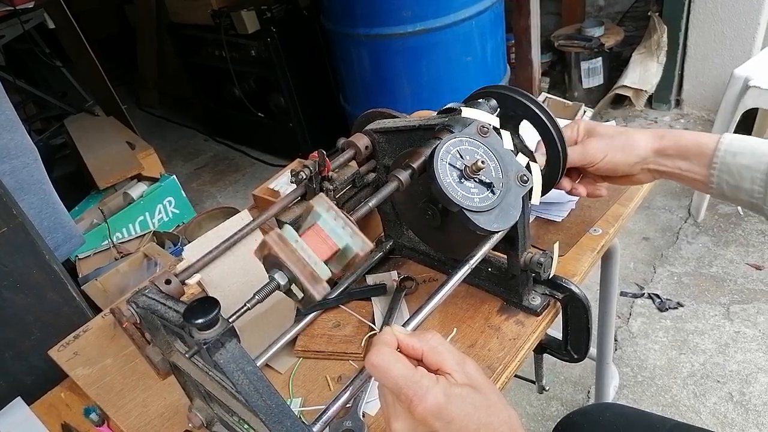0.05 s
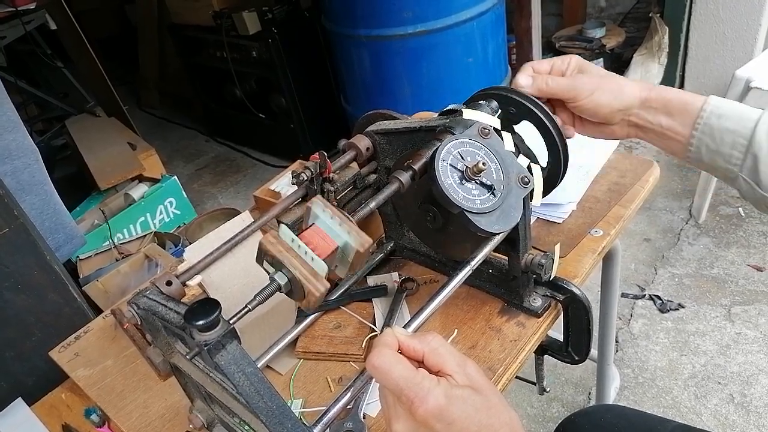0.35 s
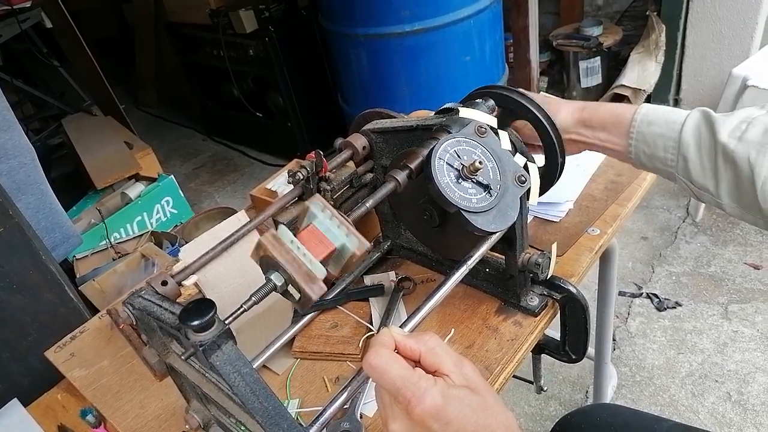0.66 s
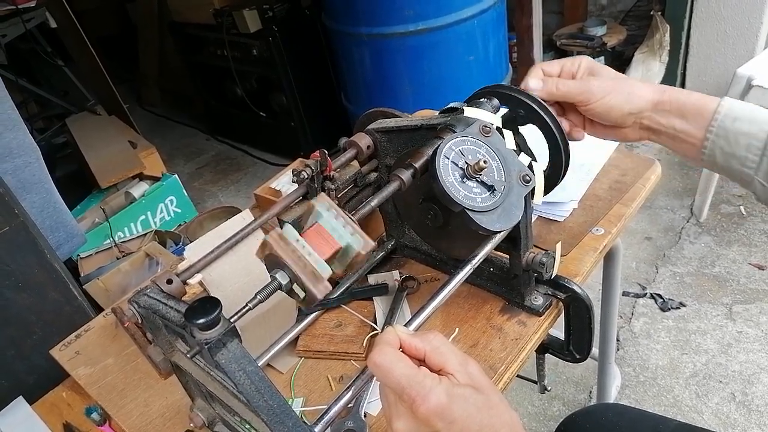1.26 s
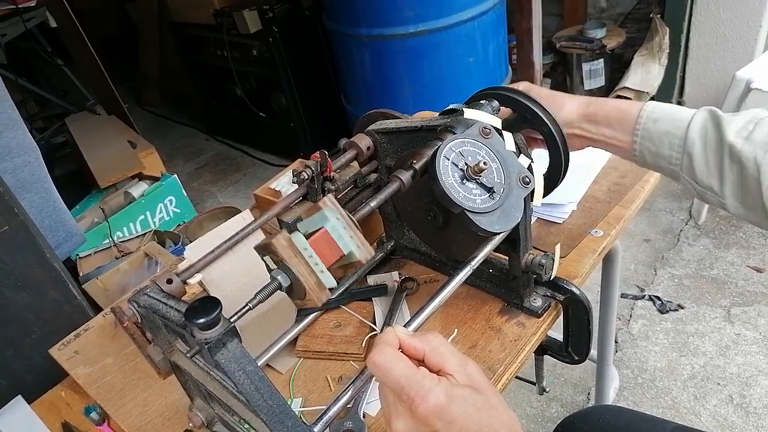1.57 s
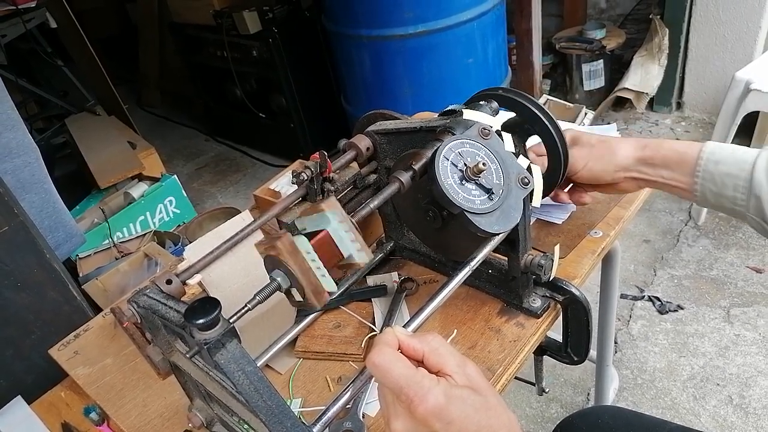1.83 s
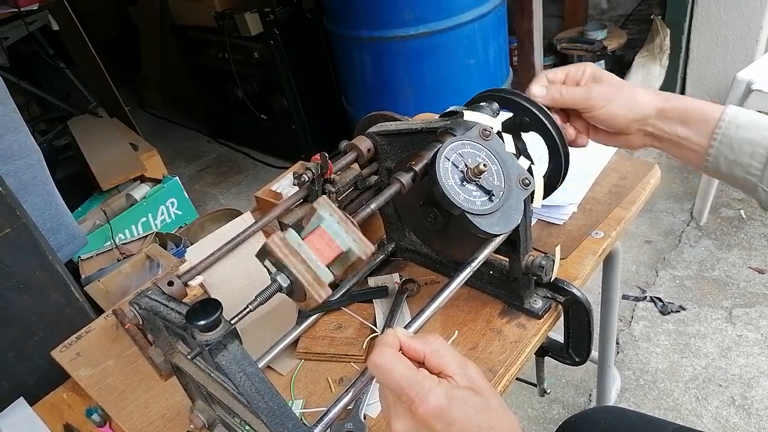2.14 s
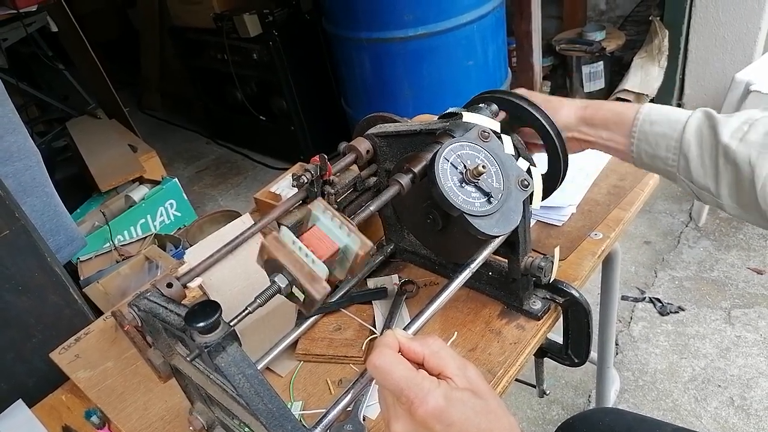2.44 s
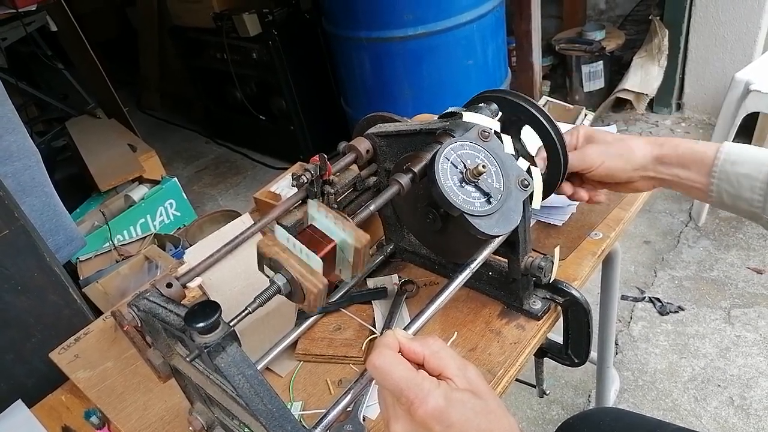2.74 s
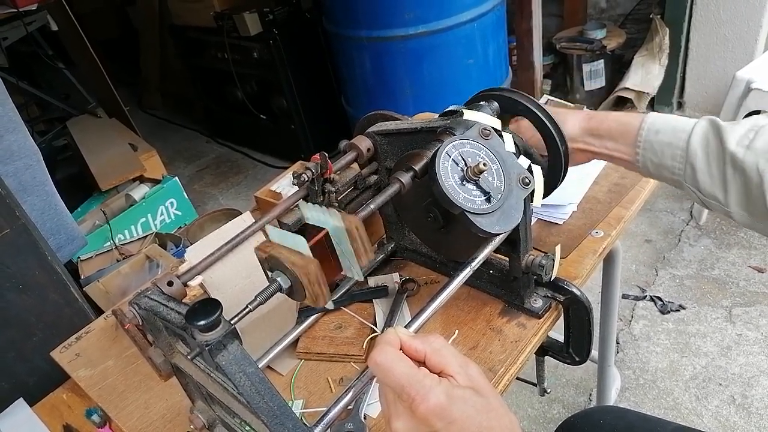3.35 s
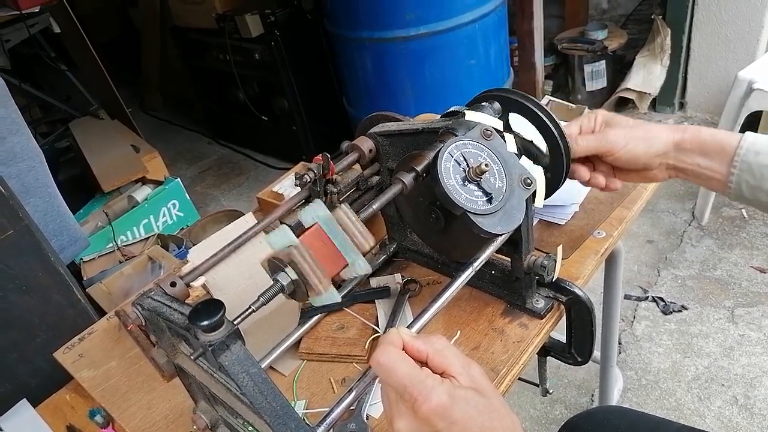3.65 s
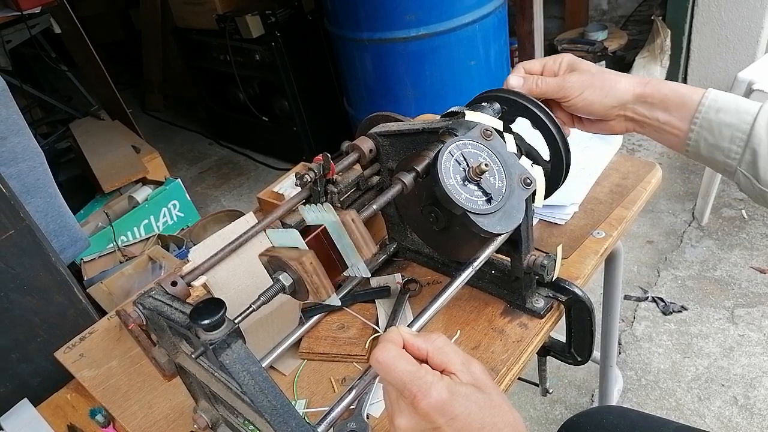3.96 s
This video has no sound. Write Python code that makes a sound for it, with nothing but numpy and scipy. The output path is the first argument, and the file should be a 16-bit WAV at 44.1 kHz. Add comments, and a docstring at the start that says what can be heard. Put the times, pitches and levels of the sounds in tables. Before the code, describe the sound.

Soft gear whir of a hand-turned winding machine, with faint clicks, scrapes and a low drone.

```python
"""A coil winder is cranked by hand in an open workshop. Friction and small impacts in its gears,
bearings and spindle make a soft whir, and the bobbin ticks and knocks. Twice the copper wire
drags through its guide, where stick-slip motion gives a run of short, bright scrapes.
Underneath lie the room's rumble and a low harmonic drone, probably a distant engine,
that climbs slowly in pitch and drops back."""
import sys
import numpy as np
from scipy import signal
from scipy.fft import rfft, irfft
from scipy.io import wavfile

SR = 44100
rng = np.random.default_rng(int(sys.argv[2]) if len(sys.argv) > 2 else 0)


def dump_mix(stems):
    """Bounce the given channels to the path in sys.argv[1] as a 16-bit WAV at rate SR."""
    frames = np.atleast_2d(stems).T  # one column per channel
    limited = np.clip(frames, -1, 1)  # hard clip at full scale
    pcm = np.round(limited * 32767).astype(np.int16)
    wavfile.write(sys.argv[1], SR, pcm)


N = 176400


def from_db(db):
    """Amplitude ratio: tenfold for every 20 dB."""
    return 10 ** (np.asarray(db) / 20)


def unit_rms(x):
    """Normalisation to unit mean power."""
    return x / np.sqrt(np.mean(x ** 2) + 1e-20)


def in_time(rows):
    """Linear interpolation of (seconds, value) rows at every sample."""
    return np.interp(np.arange(N) / SR, *np.transpose(rows))


def at_hz(rows, hz):
    """Interpolation of (Hz, value) rows on a logarithmic frequency axis."""
    row_hz, value = np.transpose(rows)
    return np.interp(np.log(hz), np.log(row_hz), value)


def colour(x, spectrum):
    """Zero-phase filtering by a curve of (Hz, dB) rows."""
    hz = np.maximum(np.arange(N // 2 + 1) * SR / N, 1)
    return irfft(rfft(x) * from_db(at_hz(spectrum, hz)), N)


def drift(rate_hz):
    """Low-passed noise: a slow random wander of unit spread."""
    hop, settle = 40, 2000
    pole = np.exp(-2 * np.pi * rate_hz * hop / SR)
    white = rng.standard_normal(N // hop + settle + 2)
    slow = signal.lfilter([1], [1, -2 * pole, pole * pole], white)[settle:]
    return np.interp(np.arange(N) / hop, np.arange(len(slow)), unit_rms(slow))


def banded_noise(spectrum, flicker_db):
    """Partially coherent stereo noise whose half-octave bands flicker independently."""
    # Each row: frequency in Hz, left-right correlation.
    correlation = [(40, 1), (130, 0.83), (300, 0.92), (650, 0.4), (1400, -0.44), (2800, 0.16),
                   (6000, -0.11), (14000, 0.031)]
    edges = 20 * 2 ** (np.arange(21) / 2)
    out, white = 0, rng.standard_normal((2, 2, N))
    for k, (low, high) in enumerate(zip(edges, edges[1:])):
        bandpass = signal.butter(2, [low, high], "band", fs=SR, output="sos")
        mid, side = signal.sosfilt(bandpass, white[k % 2])
        alike = np.clip(at_hz(correlation, np.sqrt(low * high)), -1, 1)
        band = np.sqrt(1 + alike) * mid + np.sqrt(1 - alike) * side * [[1], [-1]]
        out = out + from_db(flicker_db * drift(14.0)) * band
    return unit_rms(colour(out, spectrum))


def grains(per_s, spread_db):
    """A Poisson process of tiny contacts of uneven strength."""
    return (rng.random(N) < per_s / SR) * from_db(spread_db * np.minimum(rng.exponential(1, N), 4))


def resonate(contacts, modes, waver_db):
    """Forced resonance: contacts drive damped modes, differently on each side and in wavering strength."""
    out = 0
    for hz, width_hz, db in modes:
        radius = np.exp(-np.pi * width_hz / SR)
        feedback = [1, -2 * radius * np.cos(2 * np.pi * hz / SR), radius * radius]
        drive = contacts * rng.standard_normal((2, N)) * from_db(waver_db * np.tanh(drift(18.0)))
        out = out + from_db(db) * unit_rms(signal.lfilter([1, 0, -1], feedback, drive))
    return unit_rms(out)


def stroke(start, length, attack_s, release_s):
    """An envelope with linear rise, hold and exponential decay."""
    t = np.arange(N) / SR - start
    return np.clip(t / attack_s, 0, 1) * np.exp(-np.maximum(t - length, 0) / release_s)


def die_away(contacts, decay_s):
    """Incoherent summation: the envelope of exponentially fading contacts whose energies add."""
    return np.sqrt(signal.lfilter([1], [1, -np.exp(-2 / (decay_s * SR))], contacts ** 2 + 1e-18))


def pan(db):
    """Direction by level difference: the left gains what the right loses."""
    return from_db([[db], [-db]])


def gears():
    """Bearing friction gives broadband noise; tooth impacts ring the frame. Both follow the cranking."""
    # Each row: frequency in Hz, relative spectral density in dB.
    spectrum = [(100, -17), (250, -3.5), (380, -5), (500, -6.5), (900, -6), (1350, -8.5), (1850, -10.5),
                (2700, -18.5), (3600, -22.5), (4200, -26.5), (5800, -31), (6500, -34.5), (7700, -35.5),
                (8400, -42.5), (10800, -41.5), (13000, -58), (15000, -59)]
    # Each row: frequency in Hz, bandwidth in Hz, relative level in dB.
    frame_modes = [(368, 39, -1.5), (856, 210, -9.5), (1295, 50, -2), (1570, 96, -5), (1808, 220, -2.5),
                   (2185, 190, -6.5), (3060, 59, -10), (3310, 110, -9), (3690, 200, -12.5),
                   (5680, 170, -22)]
    # Each row: time in seconds, relative level in dB.
    effort = [(0, -60.5), (.24, -61.5), (.4, -60.5), (.68, -61), (.85, -60.5), (1.0, -60.5), (1.45, -61),
              (1.9, -60.5), (2.3, -59.5), (2.55, -60), (2.72, -60), (2.9, -60), (3.1, -60), (3.25, -60),
              (3.5, -58.5), (3.65, -60), (4, -58)]
    rush = from_db(3) * banded_noise(spectrum, flicker_db=0.23)
    patter = from_db(-3.5) * resonate(grains(per_s=440, spread_db=2), frame_modes, waver_db=1.0)
    return from_db(in_time(effort)) * (rush + patter)


def bearing():
    """Random excitation: fine rolling contacts sustain a thin metallic ring."""
    # Each row: frequency in Hz, bandwidth in Hz, relative level in dB.
    modes = [(7400, 120, -3), (12000, 120, -13), (12700, 160, -14)]
    # Each row: time in seconds, level in dB.
    level = [(0, -87), (.38, -80.5), (.65, -91), (1.0, -88), (1.75, -89), (2.0, -92), (2.18, -81),
             (2.4, -89.5), (3.5, -85), (4, -89)]
    ring = resonate(grains(per_s=2700, spread_db=6.0), modes, waver_db=4.5)
    return from_db(in_time(level)) * ring * pan(db=1.5)


def engine():
    """Periodic firing: low partials follow one rate and reach the right side sooner and louder."""
    # Each row: time in seconds, firing rate in Hz.
    firing_rate = [(0, 43.74), (.3, 45.74), (.7, 49), (1.25, 52.36), (1.6, 52), (1.85, 56.07), (2.2, 62.17),
                   (2.55, 64.16), (2.9, 66.17), (3.2, 71.92), (3.37, 72.4), (3.44, 50.95), (4, 52.5)]
    # Each row: time in seconds, relative level in dB.
    level = [(0, -47), (.06, -50), (.14, -41.5), (.24, -47.5), (.28, -51), (.32, -42.5), (.36, -50),
             (.45, -38), (.57, -47.5), (.64, -36.5), (.7, -36.5), (.79, -60), (.89, -40.5), (.99, -38.5),
             (1.065, -47.5), (1.11, -42.5), (1.19, -36), (1.26, -35.5), (1.33, -54), (1.41, -41.5),
             (1.47, -53), (1.53, -44), (1.61, -46), (1.66, -60), (1.71, -42), (1.77, -52), (1.85, -54),
             (1.91, -37.5), (1.96, -48), (2.0, -40), (2.04, -45.5), (2.09, -38.5), (2.13, -43), (2.16, -35),
             (2.37, -34), (2.52, -34), (2.73, -41), (2.79, -54), (2.86, -48), (2.96, -46), (3.04, -38),
             (3.1, -40.5), (3.15, -37), (3.22, -44), (3.33, -42), (3.42, -46.5), (3.55, -46), (3.63, -47.5),
             (3.73, -42.5), (3.88, -46.5), (4, -76)]
    # Each row: multiple of the firing rate, relative level in dB.
    orders = [(0.782, -16), (1, 6.5), (1.5, -13), (2.002, -18)]
    gain_db, waver_db, left_lag_s = -2.94, 0.67, 0.00034
    hz = in_time(firing_rate)
    cycles = np.cumsum(hz) / SR - hz * left_lag_s * np.array([[1], [0]])
    drone = 0
    for order, db in orders:
        amplitude = from_db(db + waver_db * drift(28.0))
        drone = drone + amplitude * np.sin(2 * np.pi * (order * cycles + rng.random()))
    return from_db(gain_db + in_time(level)) * unit_rms(drone) * pan(db=-2.1)


def rumble():
    """Ambient noise: the workshop's low background swells and sinks."""
    # Each row: frequency in Hz, relative spectral density in dB.
    spectrum = [(15, -5), (30, -2.5), (50, -4.5), (80, 1.5), (102, -6), (118, -9.5), (136, -3),
                (160, -15.5), (200, -13.5), (228, -12), (270, -17.5), (380, -18.5), (600, -30.5),
                (2000, -73)]
    # Each row: time in seconds, level in dB.
    level = [(0, -53.5), (.16, -51.5), (.7, -52), (.83, -53), (1.0, -50), (1.25, -53.5), (1.38, -51.5),
             (1.55, -51), (2.0, -52), (2.4, -51.5), (2.72, -48.5), (2.9, -53.5), (3.08, -52), (3.3, -51.5),
             (3.7, -52), (3.87, -50.5), (4, -54)]
    return from_db(in_time(level)) * banded_noise(spectrum, flicker_db=-1.0) * pan(db=-1.3)


def wire():
    """Stick-slip friction: sliding wire hisses; where it catches it rasps, squeaks and rings its guide."""
    # Each row: time in seconds, level in dB.
    slide_level = [(0, -72), (.2, -82), (1.1, -79.5), (1.24, -78), (1.315, -70.5), (1.42, -80), (1.54, -78),
                   (1.66, -75), (1.75, -66), (1.81, -73.5), (1.89, -65.5), (1.96, -82.5), (2.8, -84),
                   (2.98, -73.5), (3.1, -75), (3.24, -77.5), (3.45, -72.5), (3.53, -76.5), (3.62, -69.5),
                   (3.7, -83), (3.9, -83), (3.99, -59)]
    # Each row of both: frequency in Hz, relative spectral density in dB.
    slide_spectrum = [(1500, -16), (3500, 4), (4500, 0), (5700, 0.5), (6500, -3), (7600, -0.5),
                      (8400, -2.5), (10700, 0.5), (12000, -9), (13200, -12), (15000, -14)]
    rasp_spectrum = [(2000, -34), (4000, -5), (4600, 7), (5800, -2), (6500, -3), (7600, 4), (8300, 0),
                     (9400, -1), (11200, 4), (12300, -7), (14000, -3), (15200, -7)]
    # Each row: frequency in Hz, bandwidth in Hz, relative level in dB.
    guide_modes = [(4677, 40, -2), (5005, 65, -1), (5244, 110, -5), (5673, 70, -2), (5850, 300, -5),
                   (6017, 70, -4), (7866, 60, -11), (9283, 100, -4), (9610, 130, -4), (10380, 160, -3),
                   (11000, 400, -6), (14700, 150, -14)]
    # Each row: start and length in seconds, rasp and guide levels in dB,
    # then frequency in Hz and level in dB of the low squeak and of the high squeak.
    scrapes = [(1.347, 0.023, -64, -71, 6150, -72, 8730, -75), (1.377, .02, -70, -72, 4900, -69, 7840, -75),
               (1.446, 0.046, -67, -71, 5280, -70, 9500, -71),
               (1.494, 0.026, -84, -77, 5550, -69.5, 9450, -81),
               (1.565, .011, -68, -67, 5070, -67, 11000, -72),
               (1.579, .032, -75, -69, 6010, -70, 10150, -71),
               (3.102, .014, -63, -70, 5700, -68, 10400, -75),
               (3.118, .022, -68, -68, 4670, -62, 10300, -76),
               (3.158, 0.022, -71, -69, 5600, -64, 9550, -69),
               (3.216, .014, -71, -71, 5040, -77, 10100, -80),
               (3.271, 0.022, -71, -68, 4985, -67, 9500, -73),
               (3.313, .018, -71, -77, 5670, -76, 9900, -76), (3.364, .03, -76, -77, 5370, -72, 9280, -83)]
    relative_bandwidth = 0.034  # wide enough to make the squeaks hoarse
    slips = grains(per_s=2400, spread_db=2)
    grain = unit_rms(die_away(slips, decay_s=0.0028))
    rasp = grain * banded_noise(rasp_spectrum, flicker_db=-3.0)
    guide_ring = resonate(slips, guide_modes, waver_db=2.5)
    hiss = unit_rms(np.sqrt(grain)) * banded_noise(slide_spectrum, flicker_db=2.0)
    out = from_db(in_time(slide_level)) * hiss
    for start, length, rasp_db, guide_db, low_hz, low_db, high_hz, high_db in scrapes:
        tones = from_db(guide_db) * guide_ring
        for hz, db in ((low_hz, low_db), (high_hz, high_db)):
            squeak = resonate(slips, [(hz, relative_bandwidth * hz, 0)], waver_db=4.5)
            tones = tones + from_db(db) * squeak
        # The resonances build and fade more slowly than the rasp.
        out = out + from_db(rasp_db) * stroke(start, length, attack_s=0.0033, release_s=0.0037) * rasp
        out = out + stroke(start, length, attack_s=0.0094, release_s=0.013) * tones
    return out


def spindle():
    """Modulated friction: grainy noise swells where the spindle rubs harder in its turn."""
    # Each row: start in seconds, length in seconds, level in dB.
    swishes = [(0.148, 0.1, -67), (0.262, 0.092, -64.5), (0.355, 0.061, -60), (0.427, 0.095, -61.5),
               (0.916, 0.06, -61.5), (1.005, 0.12, -65.5), (1.622, 0.071, -63.5), (1.722, 0.032, -63),
               (2.103, 0.15, -62.5), (2.27, 0.071, -59.5), (2.655, 0.13, -64), (3.037, 0.11, -62.5),
               (3.34, .05, -62.5), (3.42, 0.14, -67), (3.89, 0.086, -69)]
    # Each row: frequency in Hz, relative spectral density in dB.
    spectrum = [(500, -8.5), (1300, 8.5), (2100, 0.5), (2700, -2.5), (3600, -1), (4300, -14), (7400, -24.5),
                (15000, -42)]
    envelope = sum(from_db(db) * stroke(start, length, attack_s=0.0094, release_s=0.013)
                   for start, length, db in swishes)
    grain = unit_rms(die_away(grains(per_s=620, spread_db=4.0), decay_s=0.0035))
    return envelope * grain * banded_noise(spectrum, flicker_db=-0.5)


def crank():
    """Sliding friction: the crank scuffs in soft, dull bursts of noise."""
    # Each row: start in seconds, length in seconds, level in dB.
    rubs = [(0.16, 0.018, -66), (1.728, 0.055, -59), (1.846, 0.02, -60), (2.612, 0.065, -67),
            (3.02, 0.034, -65), (3.106, 0.043, -58), (3.455, 0.057, -64), (3.751, 0.029, -57)]
    # Each row: frequency in Hz, relative spectral density in dB.
    spectrum = [(60, -35), (150, -11), (235, 5.5), (400, -13.5), (620, 4.5), (800, -3), (1000, -4.5),
                (2000, -42), (5000, -44), (15000, -56)]
    envelope = sum(from_db(db) * stroke(start, length, attack_s=0.0084, release_s=0.0092)
                   for start, length, db in rubs)
    return envelope * banded_noise(spectrum, flicker_db=0.5)


def ticks():
    """Impulsive transients: turns of wire snap into place, a few clear ticks among many fine ones."""
    # Each row: start in seconds, relative level in dB.
    clear_ticks = [(0.35, -60), (.652, -66), (0.96, -59.5), (1.432, -71), (1.571, -55), (1.667, -68),
                   (2.137, -73), (2.1617, -53), (2.279, -68), (2.442, -72), (2.586, -66), (2.697, -65),
                   (2.724, -56), (3.69, -69), (3.8313, -56)]
    # Each row: frequency in Hz, relative spectral density in dB.
    spectrum = [(1000, -28), (4000, 1), (5800, 2), (8000, -2.5), (10300, 6.5), (12000, -21), (15000, -13)]
    fine_per_s, fine_db, clear_gain_db = 12, -82, -5
    snaps = from_db(fine_db) * (rng.random(N) < fine_per_s / SR) * rng.random(N)
    for start, db in clear_ticks:
        snaps[int(start * SR)] += from_db(db + clear_gain_db)
    return die_away(snaps, decay_s=0.0034) * banded_noise(spectrum, flicker_db=1.0)


def bobbin():
    """Damped free vibration: the bobbin knocks on its shaft; softer contacts favour its low modes."""
    # Each row: start in seconds, relative level in dB, cutoff of the contact in Hz.
    knocks = [(1.732, -57, 2000), (1.749, -54, 2000), (1.766, -65, 2000), (1.792, -51, 450),
              (3.549, -52.5, 200.5), (3.764, -58, 1504)]
    # Each row: frequency in Hz, time to decay by 60 dB in seconds, relative level in dB.
    modes = [(60.6, 0.1, 10.5), (189, 0.14, -2.5), (246, .13, 1), (542, 0.096, -5.5), (626, 0.074, -2.5),
             (955, .07, -5.5), (1290, 0.055, -8)]
    gain_db, detune = 4.5, 0.017
    out = 0
    for start, db, contact_hz in knocks:
        t = np.maximum(np.arange(N) / SR - start, 0)
        for hz, t60, mode_db in modes:
            strength = from_db(gain_db + db + mode_db) / np.hypot(1, hz / contact_hz)
            decay = from_db(-60 * np.minimum(t / t60, 3))
            out = out + strength * decay * np.sin(2 * np.pi * hz * rng.normal(1, detune) * t)
    return out


def scene():
    """Superposition: the workshop's background and the winder's parts add linearly."""
    return engine() + rumble() + gears() + bearing() + spindle() + wire() + ticks() + crank() + bobbin()


def record(dry):
    """Frequency response: each microphone port adds its own colour, and a steep low-pass cuts the top."""
    # Each row: frequency in Hz, left minus right level in dB.
    port_balance = [(200, 0), (500, -1), (1500, 0.5), (2800, -1), (3700, -2.5), (4400, 0.5), (5000, 0),
                    (5900, 0), (6900, -2), (8400, -2), (9600, -3), (10700, 3.5), (12500, 2.5), (13300, 3),
                    (14800, 0)]
    cutoff_hz = 15250
    ports = [colour(channel, [(hz, side * db / 2) for hz, db in port_balance])
             for channel, side in zip(dry, (1, -1))]
    return signal.sosfilt(signal.ellip(12, .1, 80, cutoff_hz, fs=SR, output="sos"), ports)


dry = scene()
out = record(dry)
dump_mix(out)
```